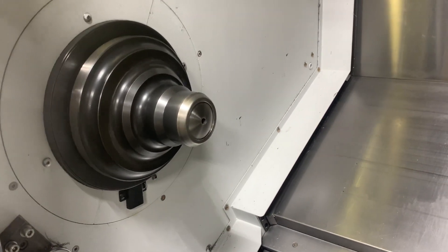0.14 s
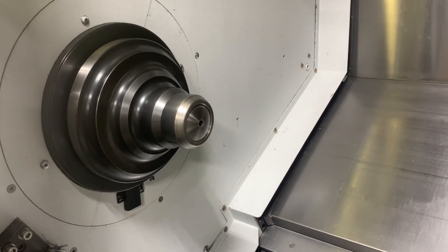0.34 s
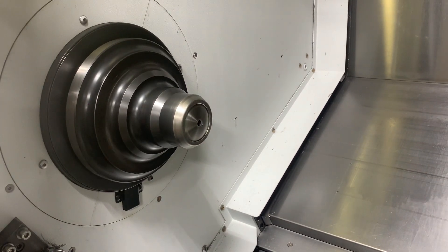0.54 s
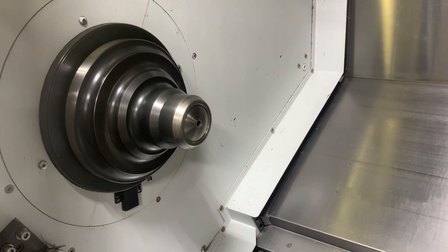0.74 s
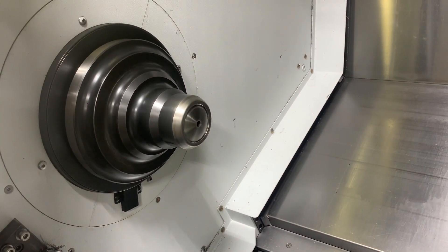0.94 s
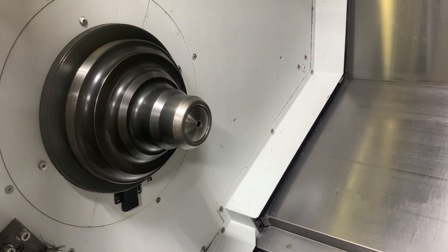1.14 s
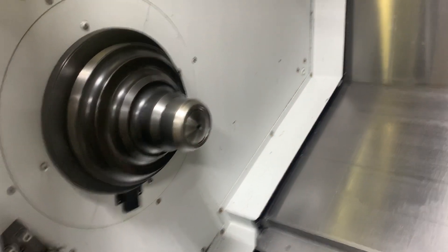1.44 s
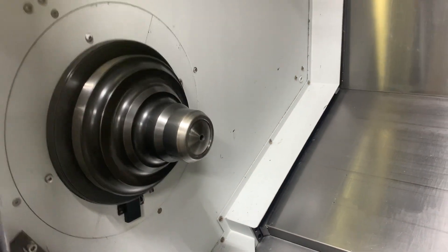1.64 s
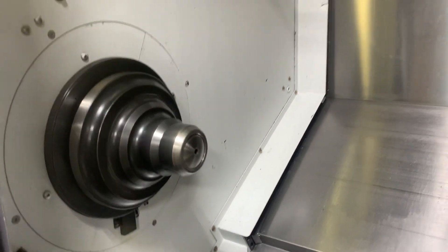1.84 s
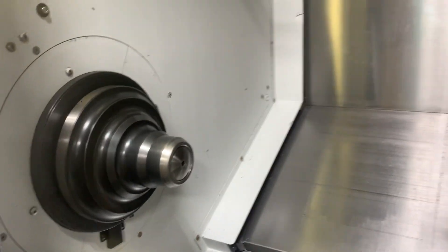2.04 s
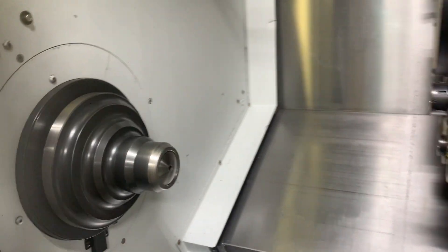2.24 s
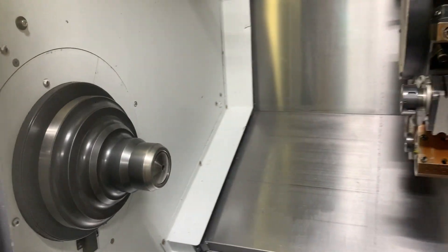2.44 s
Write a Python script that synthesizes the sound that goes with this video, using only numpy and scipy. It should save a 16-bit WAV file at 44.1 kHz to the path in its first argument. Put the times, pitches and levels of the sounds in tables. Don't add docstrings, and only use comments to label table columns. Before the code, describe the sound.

An idling lathe's hydraulic pump holds a bright, buzzing whine over fan rush and beating low hum, with thin electrical whistles; halfway, the close handheld phone swings and the tone colour shifts in stereo.

```python
import sys
import numpy as np
from scipy import signal
from scipy.fft import rfft, irfft, next_fast_len
from scipy.io import wavfile
from scipy.ndimage import uniform_filter1d, map_coordinates

SR = 44100
rng = np.random.default_rng(int(sys.argv[2]) if len(sys.argv) > 2 else 0)


def amplitude_ratio(level_db):
    exponent = np.asarray(level_db, float) / 20
    return 10 ** exponent


def wav_out(sig):
    wavfile.write(sys.argv[1], SR, np.round(np.clip(np.atleast_2d(sig).T, -1, 1) * 32767).astype(np.int16))


N = 114219
STEP = 128
SLOW_S = np.arange(0, N + STEP, STEP) / SR
TIME_S = np.arange(N) / SR


def unit(x):
    return x / np.sqrt(np.mean(x ** 2) + 1e-20)


def along(points, hz):
    point_hz, value = np.transpose(points)
    return np.interp(np.log(hz + 1), np.log(point_hz + 1), value)


def wobble(rate, channels=2):
    at = SLOW_S * rate
    knots = rng.standard_normal((channels, int(at[-1]) + 4))
    return np.array([map_coordinates(row, [at], order=2) for row in knots])


def fine(slow):
    rows = np.broadcast_to(slow, (np.shape(slow)[0], len(SLOW_S)))
    return np.array([np.interp(TIME_S, SLOW_S, row) for row in rows])


def shade(at_s, change_db):
    turn_s = 0.042
    return change_db * (1 + np.tanh((SLOW_S - at_s) / turn_s)) / 2


def filtered(x, response):
    size = next_fast_len(N + 8192)
    hz = np.fft.rfftfreq(size, 1 / SR)
    return irfft(rfft(x, size) * response(hz), size)[..., :N]


def rush(colour_db, patchy_db):
    # frequency in Hz, left-right likeness from 0 to 1.
    alike = [(30, 1), (60, 0.937), (130, 0.91), (290, 0.703), (640, 0.324), (1400, 0.066), (3000, 0.0089)]
    # frequency in Hz, left over right in dB.
    tilt = [(60, -0.5), (300, -2), (1000, 1), (2200, 2), (3500, -3.5), (5500, -8), (7200, 1.5), (8000, 8.5)]
    spectrum = signal.stft(rng.standard_normal((2, N)), nperseg=512)[2]
    patches = rng.standard_normal(spectrum.shape[1:])
    patches = uniform_filter1d(patches, size=5, axis=0)
    patches = unit(uniform_filter1d(patches, size=10, axis=1))
    noise = signal.istft(spectrum * amplitude_ratio(patchy_db * patches), nperseg=512)[1][:, :N]

    def mid_side(hz):
        angle = np.arccos(np.clip(along(alike, hz), -1, 1)) / 2
        return amplitude_ratio(colour_db(hz)) * [np.cos(angle), np.sin(angle)]

    mid, side = filtered(noise, mid_side)
    pair = np.array([mid + side, mid - side])
    return unit(filtered(pair, lambda hz: amplitude_ratio(np.outer([0.5, -0.5], along(tilt, hz)))))


def tone(phase, level_db, lead):
    start = rng.uniform(0, 2 * np.pi)
    offset = fine(np.outer([0.5, -0.5], lead))
    return np.sqrt(2) * fine(amplitude_ratio(level_db)) * np.sin(phase + start + offset)


def fans():
    # frequency in Hz, level in dB per Hz.
    rumble = [(15, -43.5), (28, -11.5), (62, 0.5), (90, -6), (115, -11.5), (170, -9.5), (270, -5.5),
              (330, -12)]
    air = [(250, -7), (500, 0.5), (1000, -5), (1900, -3.5), (3300, -12.5), (5300, -16), (9800, -18.5),
           (11500, -30)]
    # frequency in Hz, width in Hz, lift in dB.
    ducts = [(4730, 370, 1), (5370, 520, -2), (6351, 438, 8), (8300, 760, 1.5), (13300, 730, 4),
             (15000, 1200, 1)]

    def low(hz):
        return along(rumble, hz) - 12 * np.log2(np.maximum(hz / rumble[-1][0], 1))

    def high(hz):
        bumps = sum(db / (1 + (2 * (hz - centre) / width) ** 2) for centre, width, db in ducts)
        return along(air, hz) + bumps + 12 * np.log2(np.clip(hz / air[0][0], 0.01, 1))

    rumble_db = -34 + 1.9 * wobble(3.133, channels=1)
    air_db = -32.5 + shade(1.51, -0.184) + 0.113 * wobble(2.45, channels=1)
    casing = fine(amplitude_ratio(rumble_db)) * rush(low, patchy_db=0.88)
    return casing + fine(amplitude_ratio(air_db)) * rush(high, patchy_db=1.5)


def panel():
    # time of the peak in seconds, peak level in dB.
    surges = [
        (.17, -34.5),
        (.52, -40.5),
        (.88, -33),
        (1.3, -42),
        (1.64, -42.5),
        (1.9, -33.5),
        (2.04, -29.5),
        (2.29, -42),
    ]
    surge_s, panel_hz, width_hz = 0.0278, 174, 45.3
    size = sum(amplitude_ratio(db) * np.exp(-((SLOW_S - s) / surge_s) ** 2) for s, db in surges)

    def ring_db(hz):
        return -20 * np.log10(1 + (2 * (hz - panel_hz) / width_hz) ** 2)

    return fine(size[None]) * rush(ring_db, patchy_db=-1)


def shafts():
    shaft_hz = [59.97, 136.39, 162.21, 178.57, 192.58, 434, 468.5, 580, 1226.5, 1735, 2487.6, 2866.2]
    # left level in dB, right level in dB, left lead in radians.
    ports = [(-44.5, -45.5, 0), (-50, -50.5, 0.5), (-47.5, -43.5, 0.5553), (-49, -47, .5), (-49, -44.5, .5),
             (-46.5, -53, 0.12), (-51, -49.5, 0), (-51, -52.5, 0.56), (-53.5, -54, 0.17),
             (-52.5, -47.5, 3.13), (-65.5, -52, 2.5), (-55, -92, 3.5)]
    tones = np.zeros((2, N))
    for hz, (left, right, lead) in zip(shaft_hz, ports):
        level_db = np.array([[left], [right]]) + 2.63 * wobble(4.8, channels=1)
        tones += tone(2 * np.pi * hz * TIME_S, level_db, [lead])
    return tones


def fan_pair():
    # left level in dB, right level in dB.
    pair_db = [(-39.5, -36), (-39.5, -38)]
    # time in seconds, change in dB.
    strength = [(.1, -1), (.48, 1), (.74, -4.5), (1.02, 1), (1.37, 2), (1.56, 1.5), (1.74, -2.5), (1.92, 1),
                (2.1, -1), (2.3, -5.5), (2.48, -4)]
    in_step_s = 1.011
    hum = np.zeros((2, N))
    for hz, db in zip((88.28, 93.75), pair_db):
        drift_db = np.interp(SLOW_S, *np.transpose(strength)) + 0.43 * wobble(1.93, channels=1)
        level_db = np.reshape(db, (2, 1)) + drift_db
        hum += np.sqrt(2) * fine(amplitude_ratio(level_db)) * np.sin(2 * np.pi * hz * (TIME_S - in_step_s))
    return hum


def drive():
    line_hz = [4349.2, 4650, 4813, 8199.6, 8899.4, 8998.5, 9099.7, 9699.3, 9799.4, 12850, 13349, 13449.2,
               13549, 13649.7, 14149.2]
    # level in dB while still, time of the change in seconds, change in dB.
    lines = [(-50, 1.74, 7), (-46, 1.75, -11.5), (-51.5, 2.56, -2.5), (-47, 2.15, -2), (-46, 1.38, -5),
             (-47.5, 2.14, -12), (-43.5, 1.76, -5.5), (-64, 1.8, -1), (-50.5, 2.22, -6.5),
             (-66.5, 1.81, 13), (-70, 1.8, 0), (-61, 1.8, -4.5), (-66, 1.8, -0.5), (-63, 1.8, -1.5),
             (-74, 1.8, 2)]
    whistle = np.zeros((2, N))
    for hz, (still_db, at_s, change_db) in zip(line_hz, lines):
        level_db = still_db + shade(at_s, change_db) + 0.5 * wobble(5.35, channels=1)
        whistle += tone(2 * np.pi * hz * TIME_S, level_db, [2.5])
    return whistle


def pump():
    # order, left level in dB, right level in dB, left lead in radians.
    still = [(3, -45, -47, 2.3), (4, -29, -47, 1.1), (5, -50, -48, 0.5), (6, -43, -40, -0.6),
             (7, -43, -41, 2.1), (8, -42, -39, -1.4), (9, -42, -52, 1.6), (10, -45, -42, -2.6),
             (11, -53, -52, 2.7), (12, -65, -58, 1.7), (13, -46, -45, -0.4), (14, -49, -47, -1.5),
             (15, -50, -50, -2.8), (16, -64, -67, -1.3), (17, -55, -54, -3.0), (18, -58, -54, -0.8),
             (19, -58, -57, -2.3), (20, -55, -49, 2.6), (21, -64, -61, -0.7), (22, -60, -52, 3.0),
             (23, -65, -59, -1.2), (24, -57, -56, 2.9), (25, -66, -53, -0.9), (26, -52, -52, -0.7)]
    swing_s = [1.42, 1.52, 1.66, 1.8, 1.94, 2.08, 2.22, 2.36, 2.49]
    low_paths = {3: [(-44, -46, 2.5), (-45.5, -44.5, 1.5), (-45.5, -52.0, 4.5), (-46.5, -51.5, 1.5),
                 (-63, -50, -3), (-49, -51, 3.43), (-54, -51.5, -0.08), (-41, -58.5, 2)],
                 4: [(-28.5, -61, -0.5), (-28.0, -43.5, -2.5), (-29.5, -42.5, -2.5), (-30.0, -37.5, -2.5),
                 (-31.5, -36, -2.5), (-32, -44, -2.0), (-31, -35.5, 1.57), (-34, -35, 0.9)],
                 6: [(-55, -49.5, 0.5), (-44, -47.5, -3), (-40, -40.5, 2.5), (-36, -47.5, -2.5),
                 (-34, -40.5, -0.89), (-33.5, -33.5, -1.7), (-36.5, -36, 1.35), (-42.5, -42.0, -1.39)],
                 7: [(-42.5, -45.5, 2.5), (-44.5, -49.5, -1.5), (-49, -49, -1.0), (-41, -39.5, 0.5),
                 (-40, -37, 1.47), (-37, -41.5, -3), (-38.5, -47.0, -2.0), (-49, -44.5, 2.0)],
                 8: [(-42, -48, -3.0), (-40.5, -51.5, -1.5), (-37, -44, -0.7), (-38.5, -47.5, -0.97),
                 (-35.0, -55, -0.1), (-37.5, -66.5, 0.86), (-35.5, -40.5, 2.2), (-38.5, -52.5, -2.08)],
                 9: [(-40.5, -48.5, 0), (-38, -48, 1.1), (-43.5, -54, -0.5), (-43.5, -55, 0.6),
                 (-54, -49.5, 3.5), (-44.5, -45.5, -2.5), (-44.5, -44, -1.5), (-55, -53.5, -3.14)],
                 10: [(-43, -44.5, 3.5), (-46.5, -43.5, 2.33), (-43, -40.0, 1.5), (-40.5, -40.5, 0.08),
                 (-42.5, -52.5, -4.17), (-41.0, -45.5, -0.96), (-44.5, -45, 0.4), (-43, -41.0, 1.56)]}
    high_paths = {12: [(-56.0, -56.5, 2.3), (-52.0, -50.5, 2.3), (-56.0, -52.5, 1.3), (-50.5, -55.5, 1.9),
                  (-50.5, -48.0, 2.6), (-47.0, -50.5, 0.2), (-47.0, -68.5, -0.6), (-43.0, -42.0, -3.0)],
                  13: [(-46.0, -49.5, 1.4), (-44.5, -45.0, 2.9), (-45.0, -43.0, -2.7), (-46.0, -42.5, -2.9),
                  (-49.5, -48.0, 2.5), (-53.5, -50.0, 2.2), (-48.0, -47.0, 2.0), (-47.5, -44.0, -3.0)],
                  15: [(-64.5, -61.5, 2.8), (-59.0, -51.0, -3.1), (-55.0, -51.5, 2.8), (-54.5, -54.0, 2.6),
                  (-49.5, -49.0, -2.9), (-46.5, -48.0, -1.9), (-49.0, -47.5, 0.6), (-59.0, -51.0, 2.6)],
                  16: [(-65.0, -57.5, 0.1), (-56.5, -55.0, -0.5), (-55.0, -54.0, -0.2), (-59.0, -53.0, 1.0),
                  (-56.0, -51.0, 0.1), (-56.5, -51.0, -2.5), (-52.5, -48.0, -0.5), (-55.5, -50.5, 2.3)],
                  17: [(-59.0, -53.5, 0.8), (-60.5, -51.5, 2.5), (-47.0, -42.0, 2.2), (-48.0, -48.5, 1.9),
                  (-52.5, -54.0, 0.7), (-55.0, -50.0, -0.3), (-64.0, -62.0, 1.1), (-53.0, -54.5, 2.7)],
                  18: [(-69.0, -58.5, 1.3), (-58.0, -50.5, 2.4), (-58.0, -50.0, 2.2), (-55.0, -52.0, 0.1),
                  (-51.0, -49.5, -0.2), (-58.5, -58.5, 1.1), (-52.5, -57.5, -1.7), (-69.0, -58.0, 0.8)]}
    shaded = {4: (2.532, -19), 14: (1.49, -12.5), 20: (1.39, -11.5), 22: (2.18, -13), 24: (1.8, -7),
              26: (1.55, -4.5)}
    piston_hz, jitter_rad = 270.39, 0.012
    phase = 2 * np.pi * piston_hz * TIME_S + jitter_rad * fine(wobble(3.07, channels=1))[0]
    moving = np.interp(SLOW_S, swing_s[:2], [0, 1])
    paths = {**low_paths, **high_paths}
    song = np.zeros((2, N))
    for row in still:
        order = round(row[0])
        chance = wobble(4.095, channels=3)
        if order in paths:
            left, right, lead = np.transpose([row[1:], *paths[order]])
            level_db = np.array([np.interp(SLOW_S, swing_s, side) for side in (left, right)])
            lead = np.interp(SLOW_S, swing_s, np.unwrap(lead))
        else:
            level_db = np.array([[row[1]], [row[2]]]) + 2.5 * moving * chance[:2]
            lead = row[3] + moving * chance[2]
        level_db = level_db + 0.35 * wobble(5.74) + shade(*shaded.get(order, (0, 0)))
        song += tone(order * phase, level_db, lead)
    first = round(still[-1][0]) + 1
    for k, scatter in enumerate(rng.standard_normal(30)):
        level_db = -62.5 - 0.2941 * k + 2 * scatter + 2.65 * wobble(3.34, channels=1)
        song += tone((first + k) * phase, level_db, [0])
    return song


def scene():
    return fans() + panel() + shafts() + fan_pair() + drive() + pump()


def band_limit(x):
    return signal.sosfilt(signal.butter(12, 17060, fs=SR, output="sos"), x)


def record(dry):
    # frequency in Hz, share of the left port in the right channel from 0 to 1.
    shared = [(5600, 0.114), (6300, 0.423), (7200, 0.26), (8150, .55), (8500, 1), (9500, 0.982),
              (11000, 0.97), (13600, 1), (14900, 0.64)]
    zero_hz, turn_hz = 6150, 4880

    def share(hz):
        return np.clip(along(shared, hz), 0, 1) * (hz > 4000)

    def lead(hz):
        return np.exp(2j * np.pi * (hz - zero_hz) / turn_hz)

    from_left = filtered(dry[0], lambda hz: share(hz) * lead(hz))
    from_right = filtered(dry[1], lambda hz: np.sqrt(1 - share(hz) ** 2))
    mix = np.array([dry[0], from_left + from_right])
    return band_limit(filtered(mix, lambda hz: hz < 15740))


dry = scene()
out = record(dry)
wav_out(out)
```